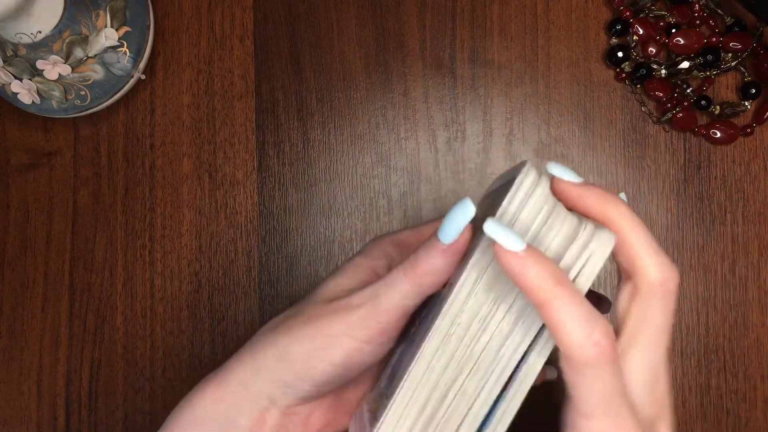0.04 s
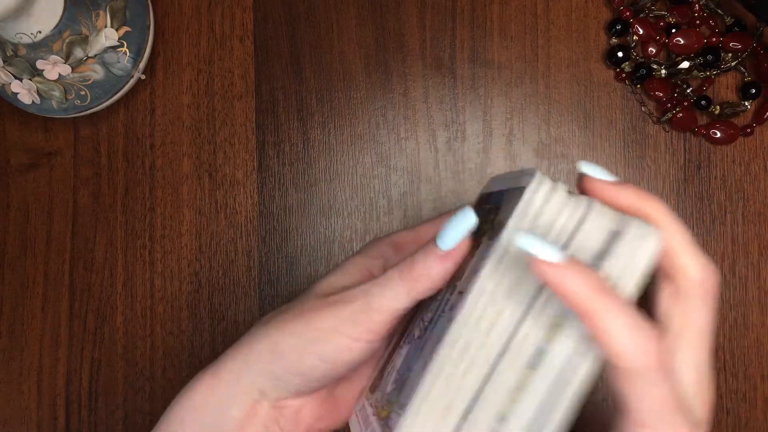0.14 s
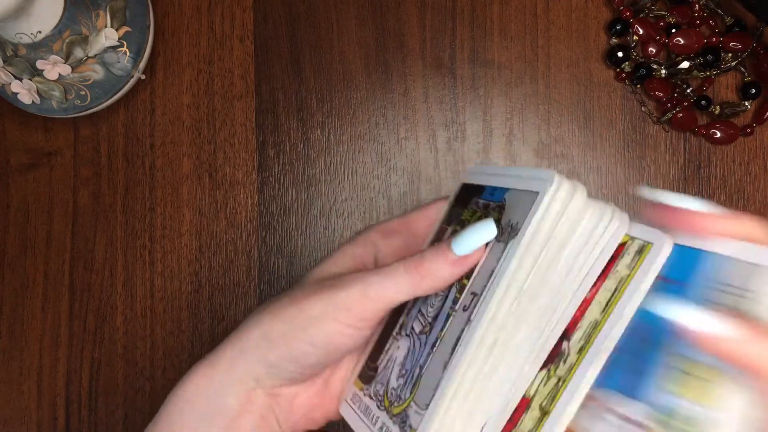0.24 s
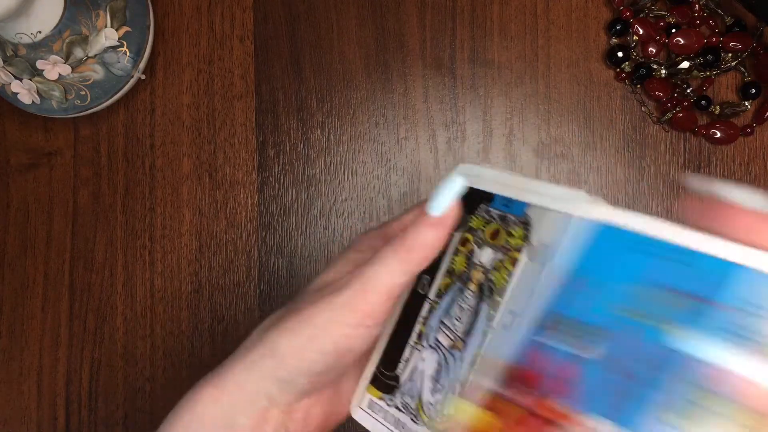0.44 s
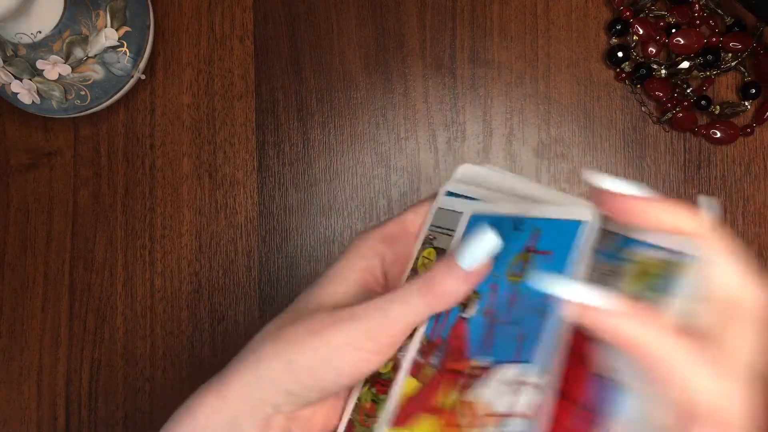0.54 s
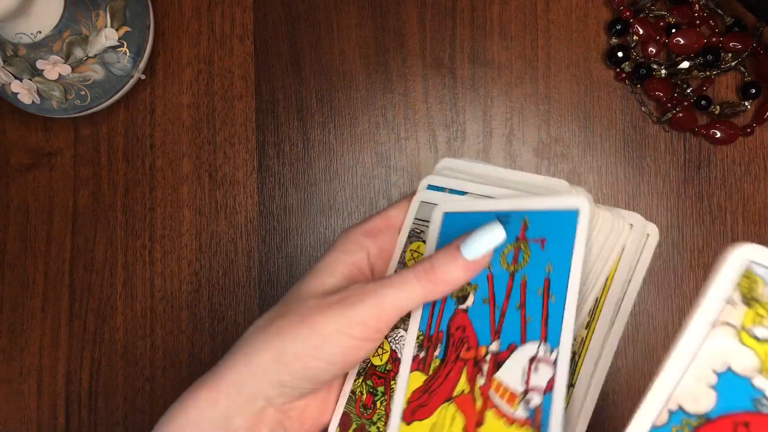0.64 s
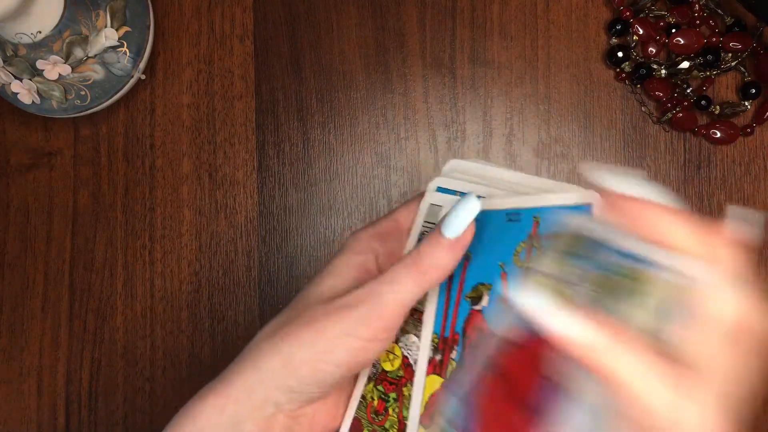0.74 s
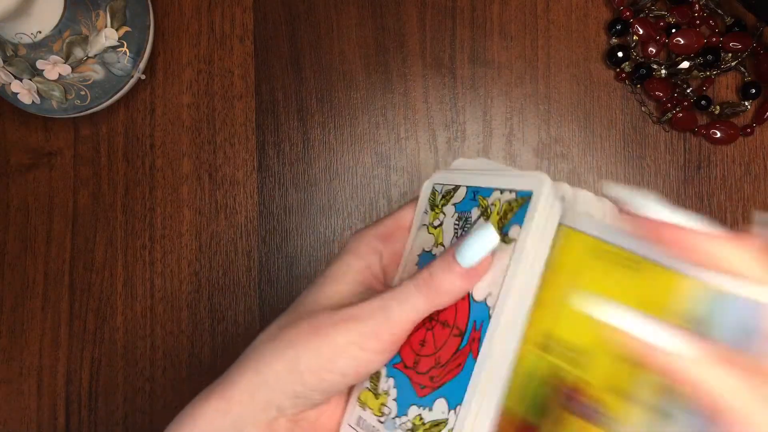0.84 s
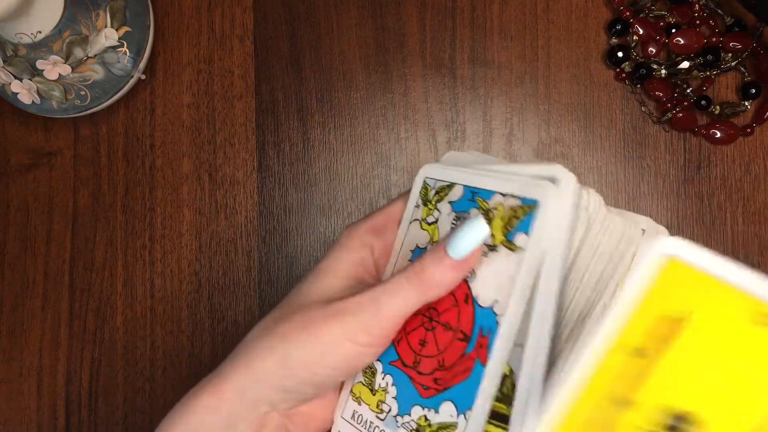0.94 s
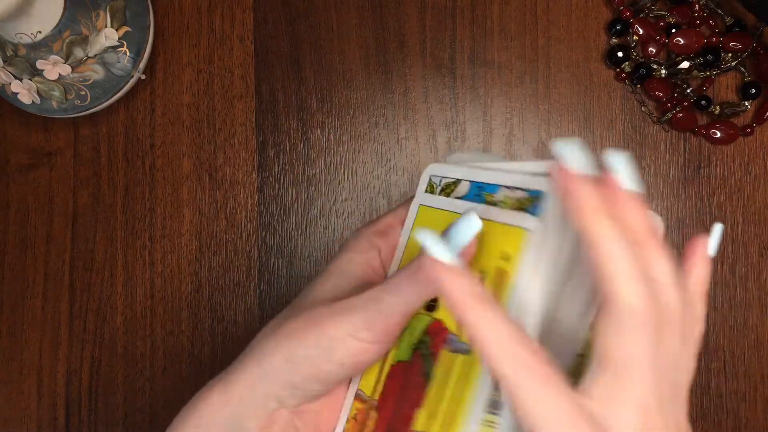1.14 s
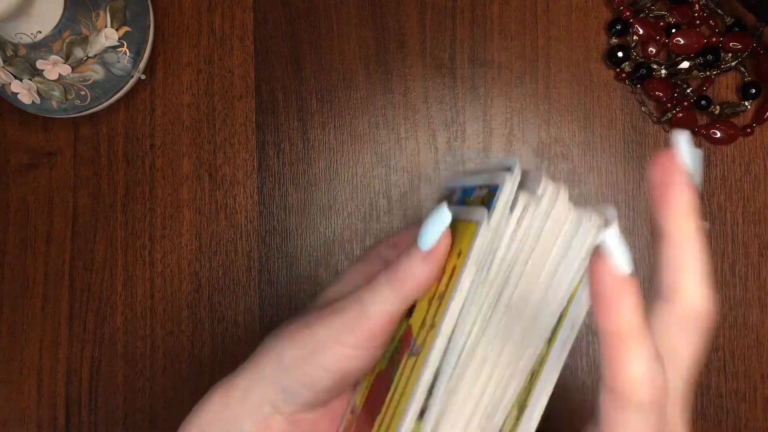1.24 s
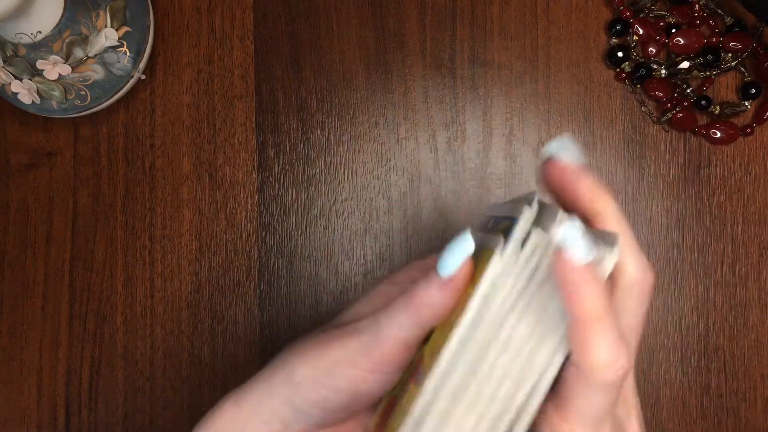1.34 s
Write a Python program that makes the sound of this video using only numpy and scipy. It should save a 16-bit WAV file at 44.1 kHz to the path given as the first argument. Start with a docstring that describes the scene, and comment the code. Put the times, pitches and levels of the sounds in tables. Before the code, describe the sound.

Playing cards slide and snap in quick uneven strokes, packets landing with crisp clicks and flat slaps over faint thumps; activity pauses briefly before a final light brush. Close, dry sound with a short small-room tail.

```python
"""Overhand card shuffle

A deck of cards is shuffled overhand in a small quiet room, close to the microphone.
Packets slide off with a fine hiss and a lower rasp: coloured noise full of tiny catches.
They land with sharp, dry snaps and two hard slaps: scattered edge contacts ringing the deck.
The hands take each packet with a soft low thump, a damped sine; still air lies underneath."""
import sys
import numpy as np
from scipy import signal
from scipy.fft import rfft, irfft
from scipy.io import wavfile
from scipy.ndimage import uniform_filter1d

SR = 44100
rng = np.random.default_rng(int(sys.argv[2]) if len(sys.argv) > 2 else 0)


def dump(signal):
    """Clip the signal to [-1, 1] and save it as 16-bit WAV at the path in sys.argv[1]."""
    limited = np.clip(np.atleast_2d(signal).T, -1, 1)
    pcm = np.round(limited * 32767).astype(np.int16)
    wavfile.write(sys.argv[1], SR, pcm)


N = 61739
TIME = np.arange(N) / SR   # seconds
HZ = np.maximum(np.fft.rfftfreq(2 * N, 1 / SR), 1)
HIT_SIZE = 4096   # samples in one snap or slap
HIT_HZ = np.maximum(np.fft.rfftfreq(HIT_SIZE, 1 / SR), 1)


def from_db(db):
    """Decibels to gain."""
    return 10 ** (np.asarray(db) / 20)


def rms_one(x):
    """Scale to unit rms."""
    return x / np.sqrt(np.mean(x ** 2) + 1e-20)


def at_hz(points, hz, axis=1):
    """Read a column of a table on a log-frequency axis."""
    table = np.array(points)
    return np.interp(np.log(hz), np.log(table[:, 0]), table[:, axis])


def coloured(x, spectrum):
    """Filter steady noise by a table of gains; unit rms."""
    shaped = rfft(x, 2 * N) * from_db(at_hz(spectrum, HZ))
    return rms_one(irfft(shaped)[:N])


def causal(db):
    """Minimum-phase response with the given gains: nothing sounds early."""
    cepstrum = irfft(np.log(from_db(db)))
    half = len(cepstrum) // 2
    cepstrum[1:half] *= 2
    cepstrum[half + 1:] = 0
    return np.exp(rfft(cepstrum))


def add(out, start_s, sound):
    """Mix a sound in at a time."""
    start = int(np.clip(start_s * SR, 0, N - 1))
    out[start:start + len(sound)] += sound[:N - start]


# Still air of the room. Each row: frequency in Hz, relative level in dB.
AIR_COLOUR = [(20, -34), (33, -3), (48, -0.5), (100, -4), (170, -5.5), (300, -12), (1000, -23),
              (2600, -20.5), (5000, -26), (15000, -23.5)]
AIR_DB = -66   # rms level


def still_air():
    """Steady noise, strongest in the bass, as the quiet of the room."""
    return from_db(AIR_DB) * coloured(rng.standard_normal(N), AIR_COLOUR)


# Tiny catches of the paper grain: mean rate, mean rise in size, share of the power.
CATCHES_PER_S, CATCH_SPREAD_DB, CATCH_SHARE = 1700, 3.5, 0.52


def friction(spectrum):
    """Smooth rubbing mixed with many tiny catches of random size and sign."""
    rise_db = CATCH_SPREAD_DB * np.minimum(rng.exponential(1, N), 4)
    sizes = from_db(rise_db) * rng.choice([-1, 1], N)
    catches = rms_one(sizes * (rng.random(N) < CATCHES_PER_S / SR))
    rubbing = rng.standard_normal(N)
    mixed = np.sqrt(CATCH_SHARE) * catches + np.sqrt(1 - CATCH_SHARE) * rubbing
    return coloured(mixed, spectrum)


# Card sliding on card, one list for each stroke.
# Each row: time in seconds, hiss level in dB, rasp level in dB.
SLIDE_STROKES = [
    [(0.06, -70, -88), (0.125, -60.5, -74.5), (0.205, -52.5, -73), (0.232, -39, -93), (0.241, -41, -86),
     (0.251, -36, -54), (0.267, -43, -50.5), (0.281, -60.5, -73), (0.34, -78, -76.5)],
    [(0.43, -62.5, -70), (0.466, -47, -51), (0.494, -37.5, -45.5), (0.509, -53.5, -56.5), (0.536, -51, -74),
     (0.553, -48, -41), (0.58, -61.5, -58.5), (0.62, -60, -75), (0.68, -78, -97)],
    [(0.70, -77, -100), (0.724, -43, -49.5), (0.741, -38, -51), (0.749, -44, -52), (0.759, -38, -42),
     (0.792, -56, -60.5), (0.83, -58.5, -62.5), (0.89, -75, -68.5), (0.92, -91, -80)],
    [(0.96, -87, -99), (0.982, -60, -70), (0.996, -46, -45), (1.010, -45, -51.5), (1.024, -36.5, -40),
     (1.04, -58, -58.5), (1.072, -53, -53.5), (1.088, -84, -60.5), (1.13, -93, -82)],
    [(1.232, -87, -99.5), (1.243, -49, -66), (1.258, -64, -79.5), (1.274, -55.5, -63), (1.305, -65, -80.5),
     (1.362, -48, -56), (1.375, -55.5, -63), (1.40, -51.5, -62)],
]
# Colour of the light slide. Each row: frequency in Hz, relative level in dB.
HISS_COLOUR = [(1500, -16), (3000, -1), (4800, -4.5), (6300, -1.5), (8000, -3.5), (11500, 1), (15500, 1.5)]
# Colour of the pressed slide. Each row: frequency in Hz, relative level in dB.
RASP_COLOUR = [(40, -36), (130, 5.5), (300, -4.5), (700, -6), (1200, -0.5), (2000, -3), (2900, -3.5),
               (4000, -7), (8000, -18)]


def slides():
    """Card faces hiss as they slide, and rasp lower when pressed together."""
    hiss, rasp, out = friction(HISS_COLOUR), friction(RASP_COLOUR), np.zeros(N)
    for stroke in SLIDE_STROKES:
        s, hiss_db, rasp_db = np.transpose(stroke)
        fade = np.interp(TIME, [s[0] - .02, s[0], s[-1], s[-1] + .02], [0, 1, 1, 0])
        hiss_gain = from_db(np.interp(TIME, s, hiss_db))
        rasp_gain = from_db(np.interp(TIME, s, rasp_db))
        out += fade * (hiss * hiss_gain + rasp * rasp_gain)
    return out


def edge_burst(scatter_ms, first):
    """Spectrum of one contact and a dying scatter of further edges, evened out broadly."""
    t_ms = np.arange(HIT_SIZE) * 1000 / SR
    burst = rng.standard_normal(HIT_SIZE) * np.exp(-t_ms / scatter_ms)
    burst[0] = first
    spectrum = rfft(burst)
    broad_power = uniform_filter1d(np.abs(spectrum) ** 2, size=61)
    return spectrum * causal(-10 * np.log10(broad_power + 1e-12))


# Short resonances of the cards. Each row: centre in Hz, boost in dB, half width in Hz.
CARD_RESONANCES = [(653, 2.5, 40), (966, 5.5, 30), (1274, 4.5, 52), (2020, 0.5, 124), (2940, 3, 110),
                   (6400, 4, 172), (7290, 5, 100), (9300, 6, 280), (14400, 5.5, 330)]


def card_ring():
    """Response of the struck cards: narrow resonances added up in dB."""
    return causal(sum(boost_db / (1 + ((HIT_HZ - centre) / width) ** 2)
                      for centre, boost_db, width in CARD_RESONANCES))


# Card edges strike the deck. Each row: start in seconds, body, middle and treble levels in dB
# (relative to the deck's colour), ring in Hz, ring boost in dB, decay of the edge scatter in ms.
EDGE_SNAPS = [ (0.1719, -24.5, -18.5, -26, 2480, 7, 1.46), (0.2635, -4.5, -2.5, -13.5, 2980, 4.5, 2.26),
              (0.2698, -9, -15, -18, 2000, -1, 0.59), (0.4312, -16.5, -30, -46, 1040, 10, 1.0),
              (0.4376, -13, -25, -23.5, 1200, -8, 3.2), (0.446, -33, -40, -30, 5500, 14, 0.87),
              (0.4493, -9, -5, -7, 1440, 11.5, 1.2), (0.453, -7.5, -34, -11, 12300, 16, 0.78),
              (0.4614, -22, -39, -15, 13000, 3, 3), (0.4644, -14, -10, -24, 1220, -10, 1),
              (0.474, -5, -8.5, -3.5, 7000, 3, 0.69), (0.4778, -11.5, -10.5, -8.5, 1000, 16.5, 2.2),
              (0.484, -18, -6, -44, 2620, -2, 0.66), (0.4903, -31, -11, -7.5, 8500, 8, 4.1),
              (0.512, -42, -15, -23, 2850, -14, 0.88), (0.5193, -3.5, -3.5, -4.5, 3920, 6, 1.18),
              (0.5475, -6, -10.5, -14, 1306, -1.5, 1.9), (0.5653, -5, -18, -18.5, 2300, 6, 4.5),
              (0.8524, -14.5, -9.5, -20.5, 2530, -7.5, 1), (0.8640, -53, -23.5, -19, 6100, 5, 0.88),
              (0.9841, -18, -9.5, -16.5, 2500, -3, 1.1), (0.9955, -10, -22, -18, 333, 17, 2.5),
              (1.0066, -21, -15, -13, 13000, 4, 1.3), (1.0201, -4, -11.5, -9, 1380, 2, 2.3),
              (1.2460, -14.5, -22, -34, 3830, 10, 0.86), (1.3625, -18.5, -33, -20, 2800, 11, 1.5), ]
# Colour of the struck deck. Each row: frequency in Hz, relative level in dB.
DECK_COLOUR = [(40, -55), (110, -12), (190, -5.5), (300, -5.5), (450, -5.5), (680, 1), (1000, -4),
               (1500, -0.5), (1900, -3), (2400, 2.5), (3200, -1), (3900, -4), (4900, -2), (5700, -3),
               (7300, -4), (11000, -5.5), (15500, -7)]
BODY_HZ, MIDDLE_HZ, TREBLE_HZ = 1000, 2860, 8350
RING_OCTAVES = 0.36   # half width of the ring
FIRST_EDGE, SNAP_DB = 1.55, -2   # weight of the first contact against later edges; overall gain


def snaps():
    """Card edges hit the deck in short scattered bursts, each with its own colour and ring."""
    out, cards = np.zeros(N), card_ring()
    for start_s, body_db, middle_db, treble_db, ring_hz, ring_db, scatter_ms in EDGE_SNAPS:
        balance = [(BODY_HZ, body_db), (MIDDLE_HZ, middle_db), (TREBLE_HZ, treble_db)]
        ring = ring_db / (1 + (np.log2(HIT_HZ / ring_hz) / RING_OCTAVES) ** 2)
        db = at_hz(DECK_COLOUR, HIT_HZ) + at_hz(balance, HIT_HZ) + ring + SNAP_DB
        add(out, start_s, irfft(edge_burst(scatter_ms, FIRST_EDGE) * causal(db) * cards))
    return out


# The hands take the packet.
# Each row: start in seconds, level in dB, frequency in Hz, time to fall 60 dB in seconds.
HAND_THUMPS = [(0.180, -50, 73, 0.085), (0.268, -51.5, 77, 0.08), (0.483, -43, 67, 0.13),
               (0.529, -43, 83, 0.092), (0.544, -43, 124.6, 0.123), (0.576, -37, 67, 0.077),
               (0.585, -38, 105, 0.056), (0.774, -48.5, 71, 0.23), (0.859, -36, 77, 0.062),
               (0.989, -45, 60.6, 0.082), (0.999, -43.5, 120, 0.046), (1.09, -40.5, 92.5, 0.036),
               (1.246, -52, 61, 0.085)]
THUMP_RISE_S = 0.0022


def thumps():
    """Soft, quickly damped low swings of deck and hand."""
    out = np.zeros(N)
    for start_s, db, hz, t60 in HAND_THUMPS:
        decay = from_db(db - 60 * TIME / t60)
        rise = 1 - np.exp(-TIME / THUMP_RISE_S)
        add(out, start_s, decay * rise * np.sin(2 * np.pi * hz * TIME))
    return out


# A whole packet lands flat and hard. Each row: start in seconds, gain in dB,
# decay of the edge scatter in ms, colour as a list of (frequency in Hz, level in dB).
PACKET_SLAPS = [ (0.7279, 0, 0.42, [(50, -60), (170, -5), (270, -12), (420, 1.5), (620, 3.5), (780, -11),
                (950, 6), (1250, 0), (1650, 4.5), (1950, 13), (2300, 10.5), (2850, 14.5), (3300, 13),
                (3750, -6), (4100, 4), (4700, -12.5), (5500, 5), (7300, 3), (10000, 2), (13000, 1),
                (15000, -2)]), (1.0129, 0, 0.89, [(50, -52), (170, -1), (350, -25), (700, -5), (1150, -0.5),
                (1900, 0), (2800, -3), (3500, -0.5), (4400, 0), (4850, -3), (5500, 10.5), (6500, 1),
                (8000, -4.5), (11000, -6.5), (15000, -11)]), ]
SLAP_FIRST_EDGE = 4.1   # a flat landing: the first contact weighs far more than later edges


def slaps():
    """Whole packets hit the deck: one strong contact, then a brief scatter of edges."""
    out, cards = np.zeros(N), card_ring()
    for start_s, db, scatter_ms, colour in PACKET_SLAPS:
        landing = causal(db + at_hz(colour, HIT_HZ))
        add(out, start_s, irfft(edge_burst(scatter_ms, SLAP_FIRST_EDGE) * landing * cards))
    return out


# Reverberation of the small room.
# Each row: frequency in Hz, relative level in dB, time to fall 60 dB in seconds.
ROOM_TAIL = [(150, -12.5, 0.16), (600, -11, 0.23), (1500, -12.5, 0.26), (2980, -16.5, 0.14),
             (6040, -19.5, 0.18), (13600, -27.5, 0.32)]
ROOM_BUILD_S = 0.0061


def room(x):
    """A diffuse noise tail in octave bands, each dying at its own rate."""
    response, white = np.zeros(N), rng.standard_normal((2, N))
    edges = np.geomspace(125, 16000, 8)
    for k, (low, high) in enumerate(zip(edges, edges[1:])):
        hz = np.sqrt(low * high)
        build = 1 - np.exp(-TIME / ROOM_BUILD_S)
        decay = from_db(-60 * TIME / at_hz(ROOM_TAIL, hz, axis=2)) * build
        octave = signal.butter(2, [low, high], "band", fs=SR, output="sos")
        band = signal.sosfilt(octave, white[k % 2])   # neighbouring bands use different noise
        response += from_db(at_hz(ROOM_TAIL, hz)) * band * decay / np.sqrt(np.sum(decay ** 2))
    return signal.fftconvolve(x, response)[:N]


def scene():
    """Cards with their room tail, dry thumps of the hands, and still air."""
    cards = slides() + snaps() + slaps()
    return (cards + room(cards) + thumps() + still_air())[None]


LOW_CUT_HZ, CUTOFF_HZ = 36, 15800


def record(dry):
    """At the microphone the deepest bass is rolled off and the top is cut steeply."""
    low_cut = signal.butter(5, LOW_CUT_HZ, "high", fs=SR, output="sos")
    top_cut = signal.ellip(10, .2, 70, CUTOFF_HZ, fs=SR, output="sos")   # ripple, stop band in dB
    return signal.sosfilt(top_cut, signal.sosfilt(low_cut, dry))


dry = scene()
out = record(dry)
dump(out)
```